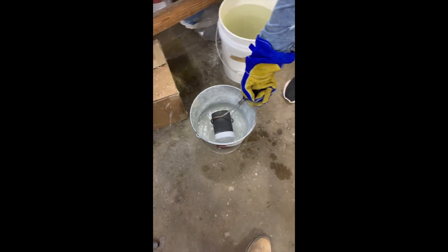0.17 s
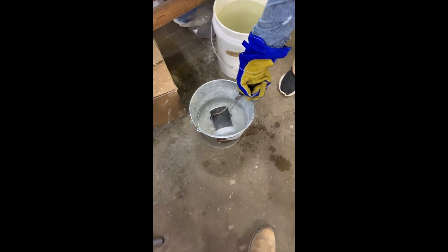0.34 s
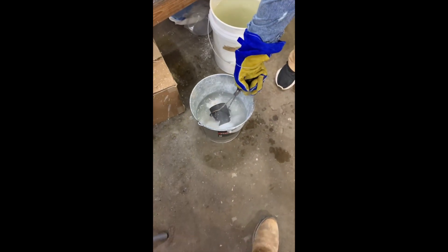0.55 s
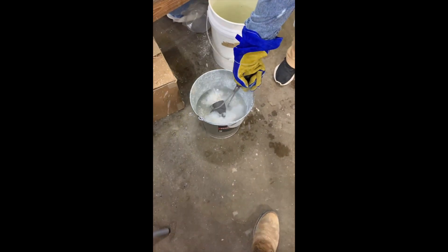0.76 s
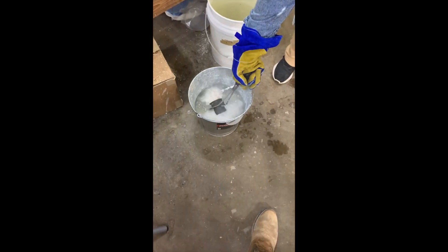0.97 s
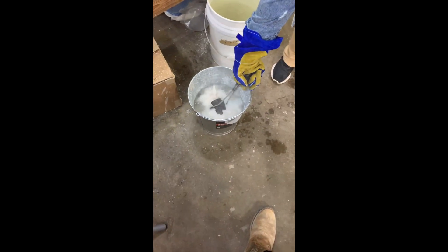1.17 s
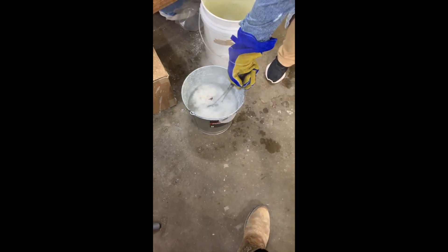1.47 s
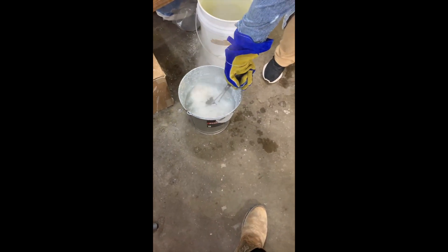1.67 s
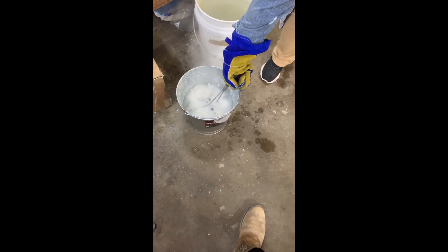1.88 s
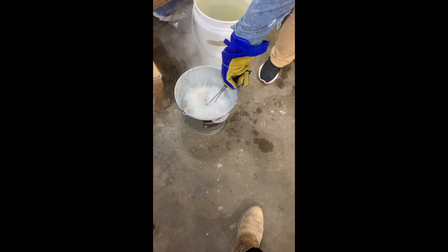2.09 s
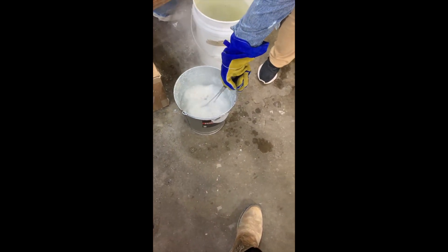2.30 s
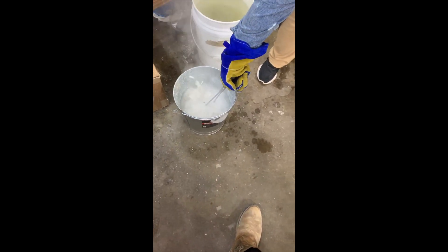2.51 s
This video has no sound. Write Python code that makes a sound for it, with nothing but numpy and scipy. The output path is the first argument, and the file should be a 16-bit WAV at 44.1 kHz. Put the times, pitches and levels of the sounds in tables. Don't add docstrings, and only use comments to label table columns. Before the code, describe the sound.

Hot metal plunged into a bucket of water, bursting into a loud steady hiss of steam

```python
import sys
import numpy as np
from scipy import signal
from scipy.fft import rfft, irfft, next_fast_len
from scipy.io import wavfile
from scipy.ndimage import uniform_filter1d, map_coordinates

SR = 44100
rng = np.random.default_rng(int(sys.argv[2]) if len(sys.argv) > 2 else 0)


def dump(signal):
    limited = np.clip(np.atleast_2d(signal).T, -1, 1)
    pcm = np.round(limited * 32767).astype(np.int16)
    wavfile.write(sys.argv[1], SR, pcm)


def boost_factor(decibels):
    exponent = np.asarray(decibels, float) / 20
    return 10 ** exponent


N = 116865

# (frequency [Hz], level [dB rms])
MOULD_MODES = [(290.7, -53), (1174, -61), (2363, -69), (3790, -81), (4554, -78), (5674, -62), (7488, -87),
               (9302, -79), (10589, -87), (13447, -92)]
# (frequency [Hz], density [dB per Hz])
ROOM_SPECTRUM = [(24, -33), (40, 9), (291, -5), (1030, -18), (1200, -14), (2600, -25), (4910, -30),
                 (14000, -29)]
# (frequency [Hz], density [dB per Hz])
RUMBLE_SPECTRUM = [(25, -48), (45, -29), (62, -2), (80, 1.5), (100, -16), (140, -10), (200, -36)]
# (time [s], level [dB])
ROLLING_BOIL = [
    (0, -72),
    (.09, -41),
    (.18, -57),
    (.31, -54),
    (.36, -39.5),
    (1.3, -43.5),
    (2.65, -48.5),
]
# (time [s], level [dB])
STEAM_FLOW = [(0.09, -27), (0.11, -19.5), (0.13, -17), (0.21, -29.5), (0.36, -22.5), (0.42, -28),
              (0.72, -23.5), (0.9, -27), (0.99, -25.5), (1.08, -31), (1.3, -28.5), (1.52, -36),
              (1.55, -30.5), (1.79, -35), (1.95, -31.5), (2.21, -40.5), (2.38, -31.5), (2.65, -31)]
# (frequency [Hz], density [dB per Hz])
HISS_SPECTRUM = [(600, -36), (1000, -5.5), (2000, -10), (3300, -5), (4200, 0), (5800, -6.5), (7500, 0.5),
                 (16000, -5.5)]
# (frequency [Hz], width [Hz], level [dB])
TIN_MODES = [(800, 15, -3), (972, 25, 6.5), (1138, 24, 2), (1290, 14, 2), (1438, 52, -3.5),
             (1670, 53, -3.5), (1800, 18, 6), (2100, 14, -1.5), (2470, 16, -20), (2550, 105, -3),
             (3043, 27, 6.5), (4020, 93, -5)]
# (frequency [Hz], width [Hz], level [dB])
BUCKET_MODES = [(431.4, 60.6, 2.5), (552.5, 172, -3), (652, 64, -3.5)]
# (frequency [Hz], width [Hz], level [dB])
WATER_MODES = [(143, 42, 0.5), (259, 58, 2.8)]
# (time [s], wall level [dB], water level [dB])
CHURNING = [
    (.085, -64, -80),
    (.11, -37.5, -53),
    (.175, -29.5, -53.5),
    (.21, -35.5, -47.5),
    (.4, -34.5, -45),
    (1.4, -32.5, -38.5),
    (2.65, -30.5, -38),
]
# (time [s], air column pitch [Hz], level [dB])
FILLING = [
    (.095, 2300, -38),
    (.108, 1936, -21.5),
    (.122, 1468, -25),
    (.136, 1097, -19.5),
    (.152, 946, -22),
    (.172, 860, -17.5),
    (.19, 814, -27),
    (.21, 870, -37),
]
# (multiple of pitch [ratio], width over pitch [ratio], level [dB])
COLUMN_MODES = [(1, .13, 2), (1.3, .2, 0), (1.9, .28, -2), (2.8, .6, -9)]
# (time [s], peak level [dB], pitch [Hz])
POCKETS = [(0.3164, -19, 1960), (0.4228, 3, 1720), (0.4836, -12, 1560), (0.4984, -19, 1710),
           (0.557, -23, 1840), (0.629, -34, 1870), (0.655, -15, 2920), (0.6733, -20, 1800),
           (0.689, -29, 980), (0.7248, -29, 1220), (0.7487, -18, 1610), (0.76, -24, 1900),
           (0.8016, -18, 2190), (0.815, -36.5, 2440), (0.9083, -17, 1520), (0.9547, -20, 1470),
           (1.031, -28, 1770), (1.085, -23, 2560), (1.1044, -19, 1150), (1.1822, -12, 1710),
           (1.2381, -23, 1460), (1.282, -21.5, 2620), (1.2994, -20, 1790), (1.3434, -22, 1580),
           (1.3754, -27, 2850), (1.4461, -20, 990), (1.5299, -12.5, 1800), (1.6023, -24, 2540),
           (1.6385, -23, 1740), (1.6965, -11, 1630), (1.7426, -14, 1700), (1.8078, -8, 1100),
           (1.8696, -19, 1310), (1.8955, -29, 1400), (1.9304, -43, 2390), (1.951, -12.5, 1600),
           (2.021, -14.5, 1140), (2.0494, -18, 2700), (2.0846, -21, 1580), (2.146, -24, 2400),
           (2.1834, -18.5, 2010), (2.2493, -30.5, 3030), (2.301, -14, 1140), (2.34, -18.5, 2410),
           (2.3625, -16, 1280), (2.3794, -24, 2940), (2.4156, -21, 1550), (2.4336, -22, 1320),
           (2.4668, -27, 1420), (2.5009, -17, 1460), (2.5185, -29, 3220), (2.5616, -22, 1150),
           (2.578, -33, 2050), (2.6334, -14, 1200)]
# (time [s], peak level [dB])
SPITS = [(0.2343, -13), (0.2682, -15), (0.2882, -12), (0.3271, -22), (0.365, -7), (0.593, -14),
         (0.6379, -7), (0.7062, -1), (0.7756, -8), (0.9068, -19), (0.9796, -16), (1.1747, -24), (1.249, -6),
         (1.3812, -10), (1.5792, -31), (1.8327, -22), (1.9594, -10), (2.3689, -27), (2.4398, -23),
         (2.573, -17)]
# (time [s], peak level [dB], pitch [Hz])
BIG_BUBBLES = [
    (1.1806, -15, 1770),
    (1.6964, -5, 1550),
    (1.8085, -12, 1000),
    (2.2555, -19, 520),
    (2.58, -17, 2100),
    (1.811, -15, 1700),
    (1.6975, -13, 850),
]
# (frequency [Hz], lead [rad])
PORT_LEAD = [(0, .1), (700, .2), (900, -1.4), (2100, .3), (3900, -2.5), (5200, -3.14), (5800, -2),
             (6400, -.3)]
# (frequency [Hz], likeness [ratio])
PORT_LIKENESS = [(100, .95), (1500, .85), (2200, .7), (3000, .35), (4200, .25), (5200, .96), (5900, .5),
                 (6500, .999)]
# (frequency [Hz], left minus right [dB])
PORT_BALANCE = [(60, 2), (240, 2.5), (800, 3), (1200, -.5), (3000, 0), (4000, -5), (5200, -.5), (6300, 0)]
# (time [s], shift [Hz])
PORT_DRIFT = [
    (.15, -150),
    (.4, 200),
    (.65, 400),
    (.8, 650),
    (1.1, 100),
    (1.5, -300),
    (1.77, 200),
    (2.2, -300),
    (2.45, -700),
]

POCKET_LAG_S = .008
FROTH_TOP_DB = -17


def unit(x):
    return x / np.sqrt(np.mean(x ** 2) + 1e-20)


def along(points, hz):
    f, v = np.transpose(points)
    return np.interp(np.log(hz + 1), np.log(f + 1), v)


def curve(rows, column=1):
    table = np.transpose(rows)
    return np.interp(np.arange(N) / SR, table[0], table[column])


def wobble(rate):
    knots = rng.standard_normal(int(N * rate / SR) + 4)
    return map_coordinates(knots, [np.arange(N) * rate / SR])


def filtered(x, response):
    m = next_fast_len(N + SR // 2)
    return irfft(rfft(x, m) * response(np.fft.rfftfreq(m, 1 / SR)), m)[..., :N]


def peaks(f, modes):
    total = 0
    for k, (centre, width, db) in enumerate(modes):
        damping = 1j * f * width
        total = total + (-1) ** k * boost_factor(db) * damping / (centre * centre - f * f + damping + 1e-9)
    return total


def patchy(depth_db, ridges=lambda f, t: 0):
    f, t, z = signal.stft(rng.standard_normal((2, N)), SR, nperseg=256)
    field = uniform_filter1d(rng.standard_normal(z.shape[1:]), 4, 0)
    field = uniform_filter1d(field, 11, 1)
    gain = boost_factor(depth_db * unit(field) + ridges(f, t))
    return unit(signal.istft(z * gain, SR, nperseg=256)[1][:, :N])


def grains(s, hz, cycles, size, rise, length=400):
    k = np.arange(length)
    u = k * hz[:, None] / SR
    tone = np.sin(2 * np.pi * u * (1 + rise * u / cycles))
    envelope = np.exp(-u / cycles) * (1 - np.exp(-2 * u)) * (1 - k / length)
    w = size[:, None] * tone * envelope
    place = (s * SR).astype(int)[:, None] + k
    return np.bincount(place.ravel(), w.ravel(), N + SR)[:N]


def swarm(count, hz, spread, cycles, scatter_db, rise, length):
    def draw():
        r, g = rng.random(count), rng.standard_normal((count, 2))
        pitch = np.clip(hz * np.exp(spread * g[:, 0]), 200, SR / 3)
        size = boost_factor(scatter_db * np.clip(g[:, 1], -2, 2))
        return grains(r * N / SR, pitch, cycles, size, rise, length=length)
    return unit(np.array([draw(), draw()]))


def bumps(s, size, width_s):
    t = np.arange(0, N, 16) / SR
    bells = np.exp(-((t - s[:, None]) / width_s) ** 2)
    return np.interp(np.arange(N) / SR, t, np.sum(size[:, None] * bells, axis=0))


def shop():
    t, t60_s = np.arange(N) / SR, .6
    ring = 0
    for hz, db in MOULD_MODES:
        level = boost_factor(db + 6 + wobble(40) - 60 * t / t60_s)
        ring = ring + level * np.sin(2 * np.pi * (hz * t + rng.random((2, 1)) / 4))
    room = filtered(rng.standard_normal((2, N)), lambda f: boost_factor(along(ROOM_SPECTRUM, f)) * (f < 14000))
    return ring + boost_factor(-48) * unit(room)


def rumble():
    a = unit(filtered(rng.standard_normal((2, N)), lambda f: boost_factor(along(RUMBLE_SPECTRUM, f))))
    pair = np.array([1.32 * a[0], 0.93 * a[1] + 0.63 * a[0]])
    return pair * boost_factor(curve(ROLLING_BOIL) + 1.6 * wobble(12.1))


def puffs():
    s, db, _ = np.transpose(POCKETS)
    size = np.clip(1 + 0.12 * (np.minimum(db, FROTH_TOP_DB) + 14.5), 0, 3)
    return 3 * bumps(s + POCKET_LAG_S, size, .012)


def gulps(f, t):
    peak_db, length_s = 11, .017
    wide, climb = .4, 20
    s, db, hz = np.transpose(POCKETS)[..., None, None]
    late = t - s - POCKET_LAG_S
    off = np.log((f[:, None] + 50) / hz) - climb * late
    over_steam_db = db - np.interp(s, *np.transpose(STEAM_FLOW))
    size = np.clip(1 + .05 * (over_steam_db - 11), .2, 1.05)
    return peak_db * np.max(size * np.exp(-(late / length_s) ** 2 - (off / wide) ** 2), axis=0)


def steam():
    touch_s, dive_s, touch_db = .083, .096, -40
    t = np.arange(N) / SR
    flow_db, puff_db = np.where(t < dive_s, touch_db, curve(STEAM_FLOW)), puffs()
    spits = swarm(count=12000, hz=7600, spread=0.48, cycles=1.0, scatter_db=7.5, rise=0, length=40)
    hiss = unit(filtered(patchy(2.5, gulps), lambda f: boost_factor(along(HISS_SPECTRUM, f))))
    hiss = hiss + boost_factor(-4.5) * spits
    flutter_db = 1.2 * (wobble(14.07) + wobble(23.99)) + 1.56 * wobble(60)
    hiss_db = flow_db + 3 + 0.27 * puff_db + flutter_db
    bubbles = swarm(count=2200, hz=1800, spread=0.367, cycles=13.5, scatter_db=2.5, rise=0.062, length=400)
    bubble_db = -39 + 0.13 * (flow_db + 42.5) + 2.04 * puff_db + 0.58 * wobble(18)
    gate = np.clip((t - touch_s) / 0.005, 0, 1) ** 2
    return gate * (hiss * boost_factor(hiss_db) + bubbles * boost_factor(bubble_db))


def froth(count=14):
    spread_s, rise = .03, 1.146
    s, db, hz = np.transpose(POCKETS)[..., None]
    u, g = rng.random((len(s), count)), rng.standard_normal((2, len(s), count))
    pitch = hz * np.exp(rise * (u - .5) + 0.21 * g[0])
    size = boost_factor(np.minimum(db, FROTH_TOP_DB) - 16 + 1.1 * g[1])
    times = s + spread_s * (u - .2)
    return grains(times.ravel(), pitch.ravel(), 4.1, size.ravel(), 0.017, length=400)


def bucket():
    s, size_db, hz = np.transpose(BIG_BUBBLES)
    pops = grains(s, hz, 2.4, boost_factor(size_db + 2.5), 0.028, length=600) + froth()
    pops = pops + grains(s + 0.0011, 480 + 0 * s, 1.46, boost_factor(size_db - 3), 0, length=900)

    def wall(f):
        return peaks(f, BUCKET_MODES) * f ** 2 / (f ** 2 + 300 ** 2) / (1 + 1j * f / 900) ** 2

    def water(f):
        return peaks(f, WATER_MODES) * f ** 2 / (f ** 2 + 110 ** 2) / (1 + (f / 290) ** 6)

    churn = unit(filtered(patchy(1.43) * boost_factor(0.67 * wobble(30.44)), wall))
    churn = churn * boost_factor(curve(CHURNING) + 0.21 * wobble(6.0))
    slosh = unit(filtered(patchy(0.92), water)) * boost_factor(curve(CHURNING, column=2))
    return churn + slosh + pops * [[1], [.3]]


def plunge():
    f, t, z = signal.stft(rng.standard_normal((2, N)), SR, nperseg=256, noverlap=224)
    f, path = f[:, None], curve(FILLING)
    pitch = path[np.minimum((t * SR).astype(int), N - 1)]
    shape = np.abs(peaks(f, [(m * pitch, w * pitch, db) for m, w, db in COLUMN_MODES]))
    shape = shape * f ** 8 / (f ** 8 + (.85 * pitch) ** 8)
    z = z * shape / np.sqrt(np.mean(shape ** 2, axis=0))
    air = signal.istft(z, SR, nperseg=256, noverlap=224)[1][:, :N]
    t, turn = np.arange(N) / SR, 2 * np.pi * np.cumsum(path) / SR
    whistle = (1.2 + wobble(170)) * np.sin(turn) + wobble(170) * np.cos(turn)
    whistle = whistle * (t > .115) * np.clip((.195 - t) / 0.0064, 0, 1)
    air = 1.06 * air + boost_factor(-7) * 0.4 * whistle * [[1], [.3]]
    return air * boost_factor(curve(FILLING, column=2) + 2.0) * (t > FILLING[0][0]) * (t < FILLING[-1][0])


def cracks():
    length_s = .004
    s, db = np.transpose(SPITS)
    shape = bumps(s + length_s / 2, boost_factor(np.minimum(db, -11) - 10), length_s)
    bright = filtered(rng.standard_normal((2, N)), lambda f: f ** 2 / (f ** 2 + 6000 ** 2))
    return shape * unit(bright)


def ports(pair):
    in_step_hz, half_turn_hz, stair, blur = 7200, 2600, .37, .65
    f, t, z = signal.stft(pair, SR, nperseg=512)
    frame = np.minimum((t * SR).astype(int), N - 1)
    f, sway = f[:, None], 90 * wobble(11.0)[frame]
    high = f > PORT_LEAD[-1][0]
    x = np.minimum(np.pi * (f - in_step_hz - sway) / half_turn_hz, 3 * np.pi)
    step = stair * (1 + .2 * wobble(11)[frame])
    x = x - step * np.sin(2 * x)
    drift = np.interp(t, *np.transpose(PORT_DRIFT))
    seen = f - drift * np.clip(1 - np.abs(f - 5200) / 1200, 0, 1) ** .5
    z = z * boost_factor(-9 * np.exp(-((f - 3250) / 260) ** 2 - ((t - .75) / .3) ** 4))
    under = np.clip((t - .92) / .45, 0, 1)
    z = z * boost_factor(-2.5 * under * np.clip(np.log2(f / 6100 + 1e-9), 0, 1))
    likeness = along(PORT_LIKENESS, seen) - high * blur * np.sin(x) ** 6
    turn = np.arccos(np.clip(likeness, -1, 1)) / 2
    low_lead = np.interp(seen - sway * (f > 900), *np.transpose(PORT_LEAD))
    lead = np.where(high, x - step * np.sin(2 * x), low_lead)
    shared, unshared = z[0] * np.cos(turn), z[1] * np.sin(turn)
    half = boost_factor(along(PORT_BALANCE, f) / 2) * np.exp(.5j * lead)
    both = np.array([(shared + unshared) * half, (shared - unshared) / half])
    return signal.istft(both, SR, nperseg=512)[1][:, :N]


def scene():
    def tin(f):
        return 1 + 0.8 * np.abs(peaks(f, TIN_MODES))

    coloured = 0.84 * filtered(steam() + plunge(), tin)
    return ports(coloured + cracks() + bucket()) + rumble() + shop()


def band_limit(x):
    return signal.sosfilt(signal.butter(12, 15800, fs=SR, output="sos"), x)


def record(dry):
    ceiling = .8
    x = filtered(dry, lambda f: f ** 4 / (f ** 4 + 38 ** 4))
    mix = x / (1 + np.abs(x / ceiling) ** 4) ** (1 / 4)
    return band_limit(mix)


dry = scene()
out = record(dry)
dump(out)
```